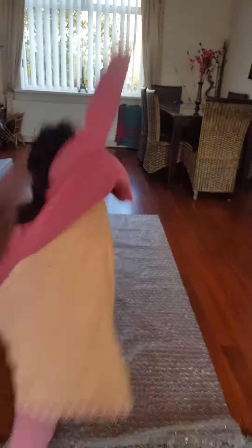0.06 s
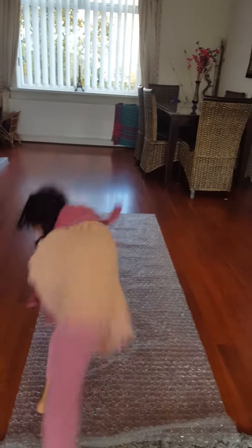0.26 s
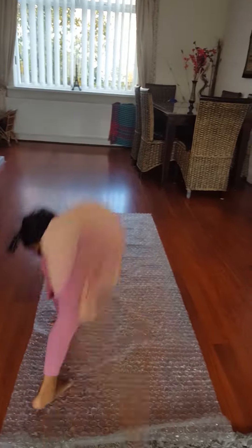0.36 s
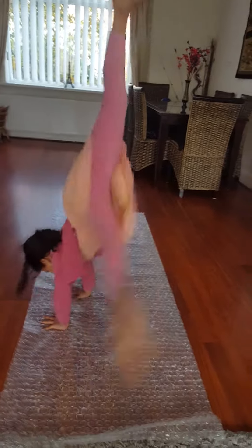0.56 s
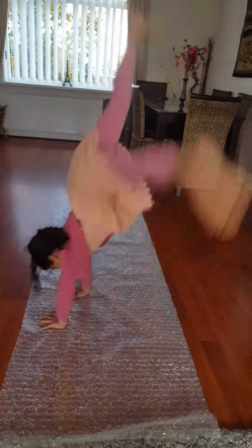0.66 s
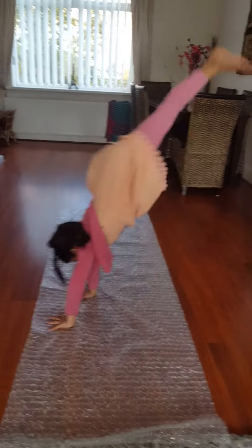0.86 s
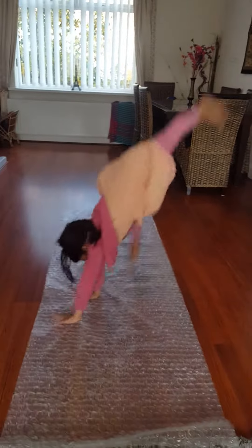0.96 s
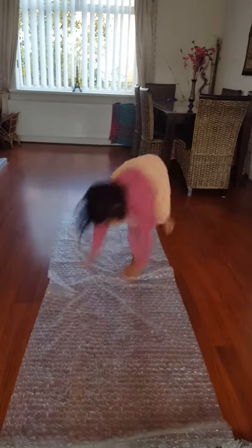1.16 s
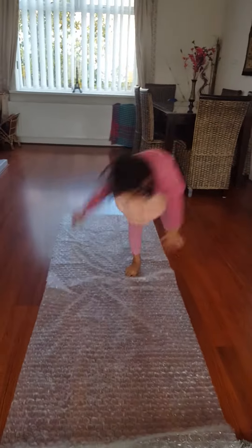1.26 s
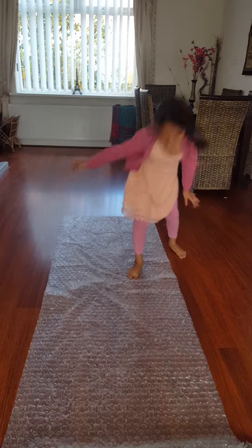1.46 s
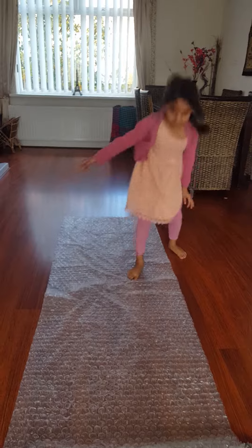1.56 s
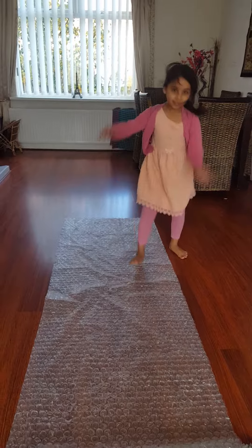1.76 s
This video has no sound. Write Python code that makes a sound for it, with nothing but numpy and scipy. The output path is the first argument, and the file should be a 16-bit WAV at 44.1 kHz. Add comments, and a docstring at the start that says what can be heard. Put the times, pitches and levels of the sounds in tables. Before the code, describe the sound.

Bubble wrap crinkles, then pops sharply under a cartwheeling child, four quick cracks with thuds between 0.2 and 0.35 seconds. Two more pops come around 0.6 seconds, and a loud double pop with a low thud at 1.1, ringing through the living room and overloading the microphone. A bare heel knocks softly on the wooden floor at 1.4 seconds, and one faint pop follows at 1.6 amid slight plastic ticking.

```python
"""A child turns a cartwheel along a strip of bubble wrap on the wooden floor of a live living room.
Over a quiet background the creased film ticks faintly. Hands, then feet, crinkle it and thud on the
boards; under them a few bubbles burst, each a pressure pulse whose sharp crack reverberates through
the room, the loudest overloading the microphone. Then a bare heel lands beside the strip and excites
the modes of the boards, and one faint pop follows."""
import sys
import numpy as np
from scipy import signal
from scipy.fft import rfft, irfft
from scipy.io import wavfile

SR = 44100
rng = np.random.default_rng(int(sys.argv[2]) if len(sys.argv) > 2 else 0)


def dump_mix(stems):
    """Bounce the given channels to the path in sys.argv[1] as a 16-bit WAV at rate SR."""
    frames = np.atleast_2d(stems).T  # one column per channel
    limited = np.clip(frames, -1, 1)  # hard clip at full scale
    pcm = np.round(limited * 32767).astype(np.int16)
    wavfile.write(sys.argv[1], SR, pcm)


N = 79380
TIME = np.arange(N) / SR


def from_db(db):
    """Amplitude ratio of a level in decibels."""
    return 10 ** (np.asarray(db) / 20)


def unit(x):
    """Normalisation to a mean energy of one per channel."""
    return x / np.sqrt(np.mean(np.sum(x ** 2, axis=-1)) + 1e-20)


def at_hz(points, hz):
    """Interpolation on a logarithmic frequency axis."""
    f, value = np.transpose(points)
    return np.interp(np.log(hz), np.log(f), value)


def band(x, low_hz, high_hz, order=2):
    """Causal band-pass filtering."""
    edges = [low_hz, min(high_hz, SR * .47)]
    return signal.sosfilt(signal.butter(order, edges, "band", fs=SR, output="sos"), x + 1e-18)


def through(x, response):
    """Convolution with a stereo impulse response."""
    return signal.fftconvolve(np.atleast_2d(x), response, axes=-1)[:, :N]


def balance(left_db):
    """Level difference between channels: the left gains what the right loses."""
    return from_db([[left_db], [-left_db]])


def click(s):
    """A unit impulse at time s."""
    return (np.arange(N) == int(s * SR)) * 1.0


def ring(s, hz, t60):
    """Free vibration of a damped oscillator, starting downwards at time s."""
    age = np.maximum(TIME - s, 0)
    return -np.sin(2 * np.pi * hz * age) * from_db(-60 * age / t60)


def noise_bands():
    """A diffuse field in half-octave bands (Hz, noise): long waves reach both sides alike."""
    # coherence of the field: (frequency [Hz], left-right correlation [1])
    coherence = [(60, 1), (170, .88), (300, 1), (500, 0.51), (1000, 0.079), (2000, -0.035), (15000, -0.32)]
    edges = 30 * 2 ** np.arange(0, 9.6, .5)
    white = rng.standard_normal((2, 2, N))
    for k, (low, high) in enumerate(zip(edges, edges[1:])):
        mid, side = band(white[k % 2], low, high)
        hz = np.sqrt(low * high)
        alike = at_hz(coherence, hz)
        yield hz, np.sqrt(1 + alike) * mid + np.sqrt(1 - alike) * side * np.array([[1], [-1]])


def background():
    """Diffuse ambient noise of the room, whose level sinks and returns."""
    # noise spectrum: (frequency [Hz], relative spectral density [dB])
    spectrum = [(30, -4.5), (70, 4), (250, 3), (600, -3.5), (1300, -8.5), (2400, -4.5), (4500, -14),
                (10000, -16), (16000, -29)]
    # noise envelope: (time [s], level [dB])
    envelope = [(0, -62.5), (.75, -71), (1.0, -72), (1.45, -67), (1.8, -62)]
    noise = unit(sum(x * from_db(at_hz(spectrum, hz)) for hz, x in noise_bands()))
    return from_db(np.interp(TIME, *np.transpose(envelope))) * np.sqrt(N) * noise


def room_responses(count):
    """Reverberation for each of count spots on the floor: it builds up, then dies fastest in the treble."""
    # reverberation time: (frequency [Hz], t60 [s])
    decay = [(60, 0.74), (200, 0.48), (500, .44), (1200, 0.44), (2500, 0.37), (5000, 0.28), (9000, 0.3),
             (15000, 0.14)]
    # reverberant spectrum: (frequency [Hz], relative level [dB])
    colour = [(60, -16.5), (160, -2), (400, -2), (900, -1), (2000, 2.5), (4000, 7), (6500, 5.5),
              (9000, 1.5), (13000, 4.5), (18000, -7.5)]
    # standing waves: (frequency [Hz], level [dB], t60 [s])
    modes = [(135, -55.5, .45), (166.1, -51, 0.44), (215, -56, 0.67)]
    gap_s, build_s = 0.00067, 0.0083
    age = TIME[:N // 2]
    bands = [(x, from_db(at_hz(colour, hz) - 60 * age / at_hz(decay, hz))) for hz, x in noise_bands()]
    swell = 1 - np.exp(-np.maximum(age - gap_s, 0) / build_s)
    standing = sum(from_db(db) * ring(0, hz, t60) for hz, db, t60 in modes)[:len(age)]
    starts = np.linspace(0, N - len(age), count).astype(int)
    tails = [sum(x[:, i:i + len(age)] * fade for x, fade in bands) for i in starts]
    return [unit(swell * tail) + swell * standing for tail in tails]


def film_ticks(room):
    """Stress relaxation: the creased film emits faint, separate ticks at random times."""
    ticks_per_s, base_db, spread_db, room_db = 45, -47.5, 2.5, -3
    sizes = from_db(base_db + spread_db * np.minimum(rng.exponential(1, N), 3)) * rng.choice([-1, 1], N)
    ticks = band(sizes * (rng.random(N) < ticks_per_s / SR), low_hz=5000, high_hz=14000, order=1)
    return ticks + from_db(room_db) * through(ticks, room)


def floor_thuds(room):
    """Impact excitation: hands and feet slap the floor into low, damped swings that set the room booming."""
    # blows: (time [s], level [dB], frequency [Hz], t60 [s], relative slap [dB], room send [dB])
    blows = [(0.087, -51, 170, .03, 28, 3.5), (0.138, -38, 85, 0.14, -30, -14.5),
             (.2132, -10, 130, 0.015, -0.5, -17.5), (.3492, 1, 135, 0.011, 4, -12.5),
             (1.066, -34.5, 230, 0.021, 7.5, 12), (1.111, -24.5, 110, 0.092, -22, 0.5),
             (1.399, -55.5, 78, 0.19, -15.5, 21)]
    slap_hz, slap_t60_s = 329.6, 0.0038
    near, to_room = 0, 0
    for s, db, hz, t60, slap_db, room_db in blows:
        thud = from_db(db) * (ring(s, hz, t60) + from_db(slap_db) * ring(s, slap_hz, slap_t60_s))
        near = near + thud
        to_room = to_room + from_db(room_db) * thud
    return (near + through(to_room, room)) * balance(left_db=0.45)


def direct_response():
    """Multipath travel: the straight path and first echoes, earlier on the right, plus a brief scatter."""
    # reflections from floor, ceiling and wall: (delay [s], level [dB])
    echoes = [(.0011, -14), (.0076, -10), (0.0113, -19.5)]
    left_lag_s, scatter_s, scatter_db = .00012, 0.0013, 3
    paths = [click(lag) + sum(from_db(db) * click(s + lag) for s, db in echoes) for lag in (left_lag_s, 0)]
    scatter = unit(rng.standard_normal((2, N)) * np.exp(-TIME / scatter_s))
    return np.array(paths) + from_db(scatter_db) * scatter


def film_crinkles(direct, room):
    """Shot noise: dense, tiny ticks of the film swell and fade under each hand or foot."""
    # the film is pressed or peeled: (peak time [s], rise [s], fade [s], level [dB])
    touches = [(0.099, 0.0097, 0.017, -35), (0.169, 0.021, 0.017, -47.5), (0.528, 0.095, 0.01, -48.5),
               (1.02, 0.042, 0.029, -59), (1.065, 0.0027, 0.09, -37), (1.38, 0.0084, 0.025, -58.5),
               (1.62, .01, .02, -59), (1.765, .04, .06, -65.5)]
    # spectrum of the film: (frequency [Hz], relative spectral density [dB])
    spectrum = [(90, -12), (180, -11), (330, 6), (800, -2.5), (2000, 1), (4000, -3.5), (9000, -9),
                (15000, -8)]
    ticks_per_s, spread_db, direct_db = 4000, 3, -2.5
    swells = [from_db(db) * np.exp(np.minimum((TIME - s) / rise, (s - TIME) / fade))
              for s, rise, fade, db in touches]
    envelope = np.sqrt(sum(swell ** 2 for swell in swells))  # incoherent sounds add in power
    sizes = from_db(spread_db * np.minimum(rng.exponential(1, N), 4)) * rng.choice([-1, 1], N)
    ticks = sizes * (rng.random(N) < ticks_per_s / SR)
    hz = np.maximum(np.fft.rfftfreq(N, 1 / SR), 1)
    crackle = irfft(rfft(ticks) * from_db(at_hz(spectrum, hz)), N)
    film = unit(crackle) * np.sqrt(N) * envelope
    return from_db(direct_db) * through(film, direct) + through(film, room)


def early_response():
    """Early reflections: a dense, decaying cluster from the nearby walls and furniture."""
    gap_s, fade_s = .008, 0.017
    age = TIME[:N // 10] - gap_s
    return unit(rng.standard_normal((2, len(age))) * (age > 0) * np.exp(-abs(age) / fade_s))


def bubble_pops(direct, rooms):
    """Sudden pressure release: a crack, two modes of the torn bubble, a puff of air and a snap of film."""
    # bursts: (time [s], crack level [dB], crack low edge [Hz], crack high edge [Hz], ring [Hz],
    # relative ring [dB], puff [dB], snap [dB], direct send [dB], early-reflection send [dB])
    bursts = [(0.2129, 9.5, 2042, 6500, 2740, -10.5, 0, 3.5, -3.5, -4.5),
              (0.2218, 11, 2166, 5200, 2170, -14.5, -11.5, -5, -6.5, -3),
              (0.255, -1, 1803, 5920, 2660, -7.5, -25, -20, -8, 11),
              (0.349, 7.5, 1910, 4400, 2130, -19.5, 1.5, 0.5, -1, 2.5),
              (0.5737, 4, 1118, 4250, 1870, 2.5, -5.5, -4, -9.5, -7),
              (.6080, 5, 1515, 3981, 2380, -12.5, -15.5, -6, -6, -7),
              (1.0811, 12.5, 1400, 4000, 1820, -7.5, 3.5, 8.5, -8.5, -9),
              (1.0881, 11, 1680, 7150, 2385, -2.5, -2, 0, -7.5, -18),
              (1.6270, -18, 997, 2200, 1260, -8.5, -50, -34, -10, -7.5)]
    half_width_hz, overtone_ratio, overtone_db = 212.5, 2.05, -10
    puff_hz, snap_hz, direct_snap_db = (130, 900), (6500, 14750), -4.5
    near, far = 0, 0
    for burst, room in zip(bursts, rooms):
        s, crack_db, low_hz, high_hz, ring_hz, ring_db, puff_db, snap_db, direct_db, early_db = burst
        pulse = click(s)
        first, second = (unit(band(pulse, hz - half_width_hz, hz + half_width_hz, order=1))
                         for hz in (ring_hz, ring_hz * overtone_ratio))
        ringing = from_db(ring_db) * (first + from_db(overtone_db) * second)
        crack = unit(band(pulse, low_hz, 2 * high_hz, order=1)) + ringing
        crack = from_db(crack_db) * unit(band(crack, puff_hz[0], high_hz, order=5))
        body = crack - from_db(puff_db) * unit(band(pulse, *puff_hz))
        snap = from_db(snap_db) * unit(band(pulse, *snap_hz))
        near = near + from_db(direct_db) * (body + from_db(direct_snap_db) * snap)
        early = from_db(early_db) * through(body + snap, early_response())
        far = far + through(body, room) + through(snap, room[::-1]) + early
    return through(near, direct) * balance(left_db=1.0) + far


def heel_knock(room):
    """Modal vibration: a bare heel strikes the uncovered boards, its soft contact rounding the attack."""
    # heel strike: (time [s], level [dB], room send [dB])
    strikes = [(1.399, -39.5, -2.5)]
    # modes of the boards: (frequency [Hz], relative level [dB], t60 [s])
    modes = [(247, 0, 0.12), (290.3, -5.5, 0.14), (328, 2, 0.15), (359, -4, 0.13), (456, -11.5, 0.12)]
    contact_s = 0.00061
    sound = 0
    for s, level_db, room_db in strikes:
        contact = 1 - np.exp(-np.maximum(TIME - s, 0) / contact_s)
        knock = contact * sum(from_db(level_db + db) * ring(s, hz, t60) for hz, db, t60 in modes)
        sound = sound + knock + from_db(room_db) * through(knock, room)
    return sound


def scene():
    """Superposition: the pressures of all sources add in one room."""
    direct = direct_response()
    room, *spots = room_responses(count=10)  # one shared response, and one for each of nine bubbles
    cartwheel = bubble_pops(direct, spots) + film_crinkles(direct, room) + floor_thuds(room)
    mix = cartwheel + heel_knock(room) + background() + film_ticks(room)
    return mix * balance(left_db=-0.09)


def record(dry):
    """Band limiting and saturation: deep bass is lost, loud cracks overload the microphone, the top is cut."""
    low_cut_hz, high_cut_hz = 63, 16000
    pressure = signal.sosfilt(signal.butter(2, low_cut_hz, "high", fs=SR, output="sos"), dry)
    saturated = np.tanh(pressure)
    return signal.sosfilt(signal.ellip(10, .2, 80, high_cut_hz, fs=SR, output="sos"), saturated)


dry = scene()
out = record(dry)
dump_mix(out)
```